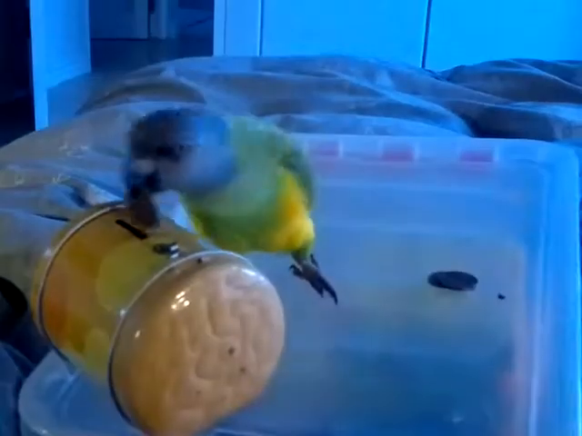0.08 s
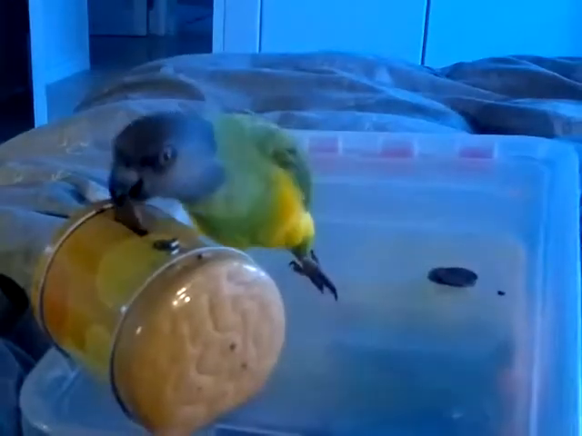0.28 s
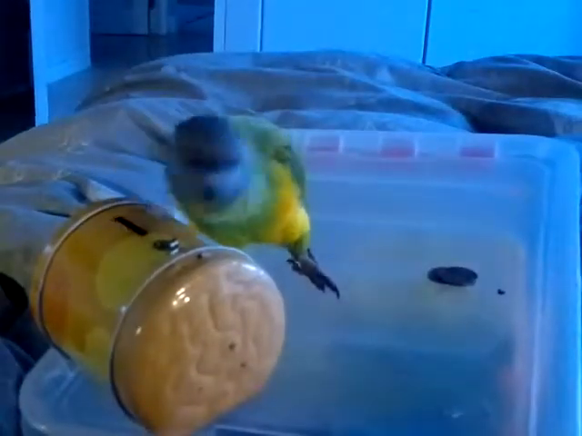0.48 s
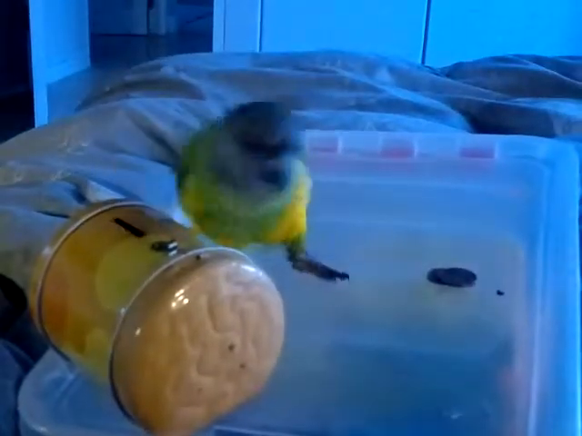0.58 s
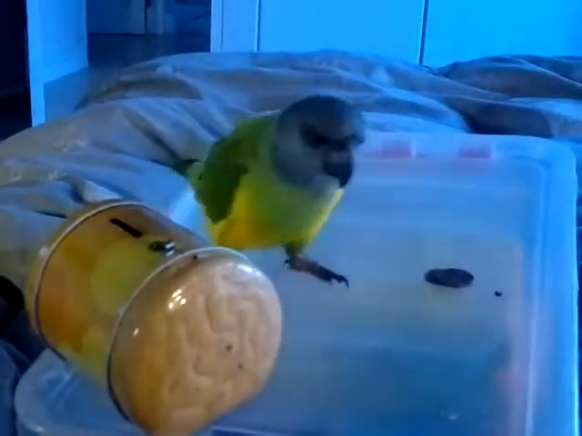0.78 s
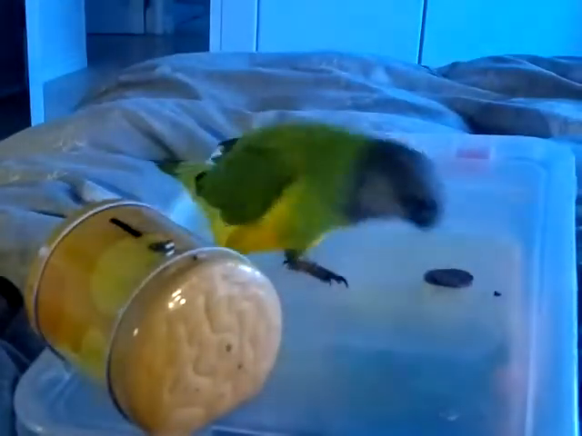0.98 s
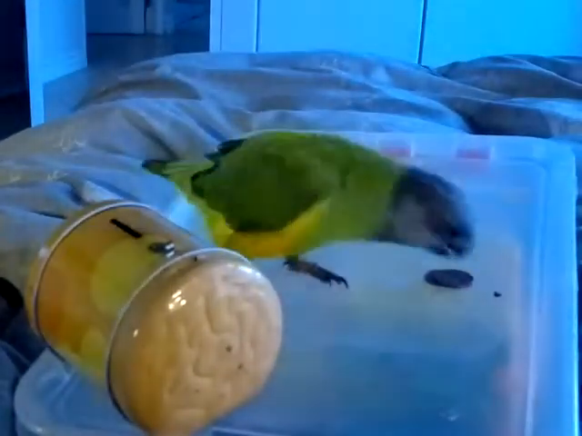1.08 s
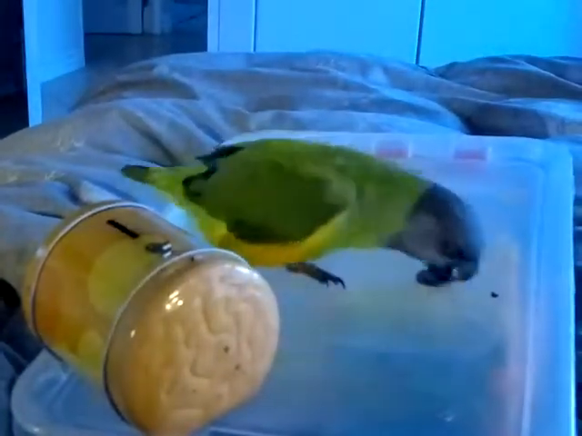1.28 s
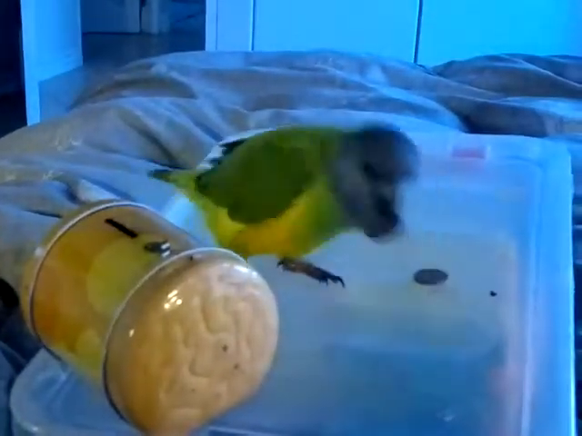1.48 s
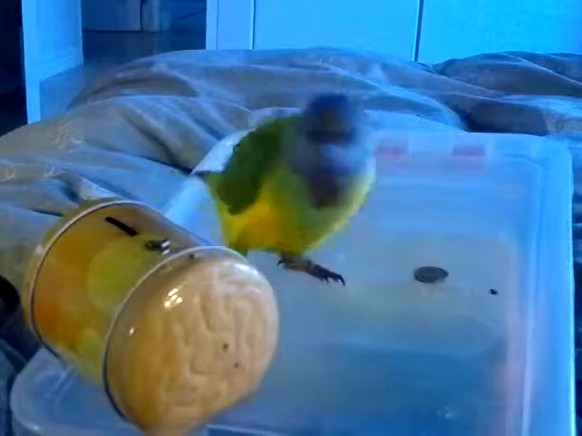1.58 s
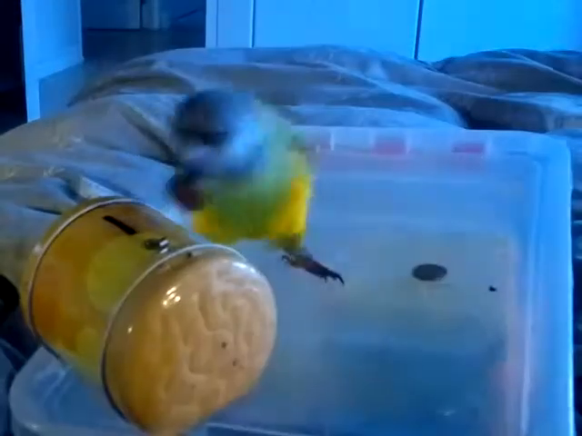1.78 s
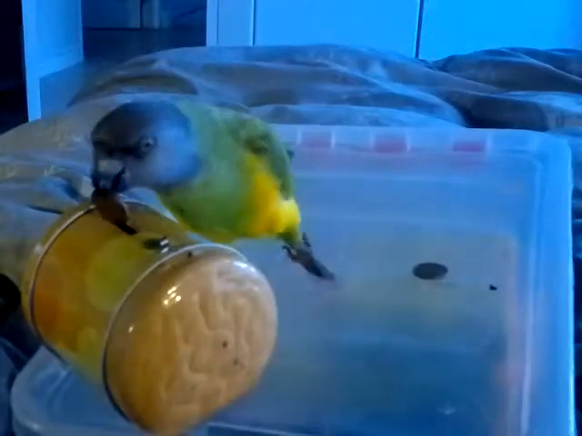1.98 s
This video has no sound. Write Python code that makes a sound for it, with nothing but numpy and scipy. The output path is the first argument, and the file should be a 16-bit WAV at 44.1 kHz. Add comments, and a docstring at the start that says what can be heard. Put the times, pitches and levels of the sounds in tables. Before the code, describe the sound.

A coin scrapes and taps at a tin bank's slot, drops in with loud bright bounces and rattles to rest; a beak clicks on a plastic lid, then another coin scrapes the tin, close in a soft-furnished room.

```python
"""A parrot scrapes and taps a coin along the slot of a tin coin bank; it drops in, bounces and rattles to rest.
The beak then picks the next coin off a plastic tub lid, and taps and scrapes it on the tin.
Throughout, a faint draught buffets the left microphone port of a small camera over its hiss.
Tin and lid are banks of decaying modes set off by single blows and streams of tiny contacts;
draught and hiss are coloured noise, and the room is a short tail of decaying noise."""
import sys
import numpy as np
from scipy import signal
from scipy.fft import rfft, irfft
from scipy.io import wavfile
from scipy.ndimage import uniform_filter1d

SR = 44100
rng = np.random.default_rng(int(sys.argv[2]) if len(sys.argv) > 2 else 0)


def wav_record(signal):
    """Record a signal, one row per channel, as 16-bit PCM in the file named by sys.argv[1]."""
    frames = np.transpose(np.atleast_2d(signal))
    bounded = np.clip(frames, -1, 1)
    # unit amplitude maps onto the largest positive 16-bit level
    quanta = np.round(bounded * 32767).astype(np.int16)
    wavfile.write(sys.argv[1], SR, quanta)


def how_loud(loudness_db):
    """Turn decibels into a plain amplitude multiplier (0 dB gives 1, 20 dB gives 10)."""
    steps = np.asarray(loudness_db, float) / 20
    return 10 ** steps


N = 88200

DULL_HZ = 5532  # soft contacts lose treble above this; modes below it die fast where a ring has a knock

# Decay of the low thumps of tin and lid. Each row: frequency in Hz, T60 in seconds.
THUMP_DECAY = [(70, .09), (400, .035)]


def at(table, hz, col=1):
    """Read a table column at the given frequencies, on a log-frequency axis."""
    rows = np.array(table, float)
    return np.interp(np.log(hz), np.log(rows[:, 0]), rows[:, col])


def coloured(table):
    """Noise of rms 1 whose spectrum follows the table."""
    hz = np.maximum(np.fft.rfftfreq(N, 1 / SR), 1)
    gain = how_loud(at(table, hz)) * (hz > table[0][0] / 2)
    noise = irfft(rfft(rng.standard_normal(N)) * gain, N)
    return noise / np.sqrt(np.mean(noise ** 2))


def hiss():
    """Steady microphone hiss, independent on the two ports and falling towards the treble."""
    # Hiss spectrum. Each row: frequency in Hz, relative density in dB per Hz.
    hiss_colour = [(40, -8), (80, -14), (170, -15.5), (1400, -36), (8000, -45), (15600, -54)]
    hiss_db = -64  # rms
    return how_loud(hiss_db) * np.array([coloured(hiss_colour), coloured(hiss_colour)])


def draught():
    """Gusty low buffeting by moving air, nearly all on the left port."""
    # Strength of the draught. Each row: time in seconds, left level in dB before the gusts.
    draught_level = [(0, -43), (.42, -43), (.835, -59), (0.866, -34.5), (.98, -38.5), (1.02, -46.5),
                     (1.1, -42), (1.2, -41.5), (1.31, -58), (1.351, -38), (1.41, -54.5), (1.59, -47.5),
                     (1.624, -32), (1.661, -54.5), (2.0, -47.5)]
    # Buffeting spectrum. Each row: frequency in Hz, relative density in dB per Hz.
    draught_colour = [(12, -2), (28, 4.5), (50, 1), (90, -9.5), (160, -25), (300, -69.5)]
    right_db, gust_db = -29.5, 2.5  # right port relative to left; gust spread before smoothing

    s, db = np.array(draught_level).T
    hold = int(SR / 25)  # a new gust value 25 times a second
    gust = np.repeat(rng.standard_normal(N // hold + 1), hold)
    gust = uniform_filter1d(gust, hold)[:N]
    envelope = how_loud(np.interp(np.arange(N) / SR, s, db) + gust_db * gust)
    return envelope * np.array([coloured(draught_colour), how_loud(right_db) * coloured(draught_colour)])


def room(x):
    """A short, dull diffuse tail from a soft-furnished room: decaying noise convolved with the sound."""
    t60_s, build_s = .16, .0029
    tail_db, top_hz = -14.5, 5240  # tail energy before its treble is cut
    alike_hz = 1000  # bass below this reaches both ports alike

    t = np.arange(SR // 2) / SR
    tail = rng.standard_normal((2, len(t))) * np.exp(-np.log(1000) * t / t60_s)
    tail = tail * np.minimum(t / build_s, 1)
    alike = signal.lfilter(*signal.butter(2, alike_hz, fs=SR), tail[0] - tail[1])
    tail = np.array([tail[0], tail[1] + alike])
    tail = tail / np.sqrt((tail ** 2).sum(axis=1))[:, None]
    tail = signal.lfilter(*signal.butter(2, top_hz, fs=SR), tail)
    return how_loud(tail_db) * signal.fftconvolve(x, tail, axes=1)[:, :N]


def rings(colour, decay, balance, count, lines=(), spots=8, snap=0., ring_db=0., rise_s=0.00024):
    """Left and right ring of an object at several spots: a sum of decaying modes, mean energy 1 per port.

    More snap makes the modes start more in step. lines are single strong modes."""
    # Phase between the ports. Each row: frequency in Hz, left lead in radians,
    # random spread of the lead in radians (narrowed by snap).
    port_phase = [(100, -0.95, 0.082), (1000, -0.23, .1), (1300, -2, 1.2), (2463, -2, 0.83),
                  (3383, -2.5, 2.2), (4644, -7.5, 3.2)]
    line_db, line_t60_s = -4.5, .055  # strongest line relative to the largest dense mode
    knock_s = .0043  # the struck spot dies this fast; the whole object rings on at ring_db
    patchy_db, neighbours = 3.2, 15  # each spot favours other groups of neighbouring modes

    # Dense modes, spread evenly in log frequency
    place = (np.arange(count) + rng.random(count)) / count
    hz = colour[0][0] * (colour[-1][0] / colour[0][0]) ** place
    t60 = at(decay, hz)
    size = how_loud(at(colour, hz)) * np.sqrt(hz / t60)
    if len(lines):
        line_hz, level = np.array(lines, float).T
        size = np.r_[size, size.max() * how_loud(level - level.max() + line_db)]
        hz = np.r_[hz, line_hz]
        t60 = np.r_[t60, line_t60_s + 0 * line_hz]

    t = np.arange(7000) / SR
    wave = np.exp(np.outer(2j * np.pi * hz - np.log(1000) / t60, t))
    rest = how_loud(ring_db * (hz < DULL_HZ))[:, None]
    wave = wave * (rest + (1 - rest) * np.exp(-(t / knock_s) ** 2))

    # How strongly each spot drives each mode
    group = uniform_filter1d(rng.standard_normal((spots, len(hz))), size=neighbours) * np.sqrt(neighbours)
    patches = how_loud(patchy_db * (group - group.mean(axis=0)))
    drive = size * (snap + rng.standard_normal((spots, len(hz)))) * patches

    spread = at(port_phase, hz, col=2) / (1 + snap)
    lead = at(port_phase, hz) + spread * rng.standard_normal((spots, len(hz)))
    side = how_loud(at(balance, hz) / 2)
    left = (drive * side * np.exp(.5j * lead)) @ wave
    right = (drive / side * np.exp(-.5j * lead)) @ wave
    out = np.array([left, right]).imag * np.minimum(t / rise_s, 1)
    return out / np.sqrt((out ** 2).sum(axis=2).mean(axis=0))[:, None]


def strike(ring, s, size, spot):
    """Set off the ring of the given spot at each time s, by convolving it with impulses."""
    train = np.zeros((ring.shape[1], N))
    sample = np.clip((s * SR).astype(int), 0, N - 1)
    np.add.at(train, (spot % len(train), sample), size)
    return signal.fftconvolve(ring, train[None], axes=2)[..., :N].sum(axis=1)


def peak_one(ring):
    """Scale each spot's ring to peak 1, averaged over the ports."""
    return ring / np.abs(ring).max(axis=2).mean(axis=0)[:, None]


def blows(high, low, table):
    """Single hits, each on the next spot, heard in the bright and the hollow ring."""
    s, db, low_rel = np.array(table, float).T
    spot = np.arange(len(s))
    return strike(peak_one(high), s, how_loud(db), spot) + strike(peak_one(low), s, how_loud(db + low_rel), spot)


def chatter(high, low, thump, curves, per_s, scatter_db, firm_db):
    """A friction stream of tiny uneven contacts at random times; those softer than firm_db lose treble."""
    spot_s = .018  # the contact stays this long at a spot
    dull_db_per_db = 1.74  # loss of treble per dB below firm

    dull = signal.lfilter(*signal.butter(4, DULL_HZ, fs=SR), high)
    draw = rng.random((4000, 3))
    s = np.cumsum(-np.log(draw[:, 0])) / per_s
    even = np.sign(draw[:, 2] - .5) * np.sqrt(SR / per_s)  # equal pushes of either sign
    size = how_loud(scatter_db * -np.log(draw[:, 1]))
    uneven = even * size / np.sqrt(np.mean(size ** 2))
    spot = (s / spot_s).astype(int)

    out = np.zeros((2, N))
    for curve in curves:
        time, high_db, low_rel, thump_rel = np.array(curve, float).T
        on = (s > time[0]) & (s < time[-1])
        when, where = s[on], spot[on]
        db = np.interp(when, time, high_db)
        firm = how_loud(dull_db_per_db * np.minimum(db - firm_db, 0))
        out += strike(high, when, firm * uneven[on] * how_loud(db), where)
        out += strike(dull, when, (1 - firm) * uneven[on] * how_loud(db), where)
        low_db = db + np.interp(when, time, low_rel)
        out += strike(low, when, uneven[on] * how_loud(low_db), where)
        thump_db = db + np.interp(when, time, thump_rel)
        out += strike(thump, when, even[on] * how_loud(thump_db), where)
    return out


def tub():
    """Beak and coin click and drag on the plastic lid, whose panel sounds and flexes below the clicks."""
    # Beak and coin clicks. Each row: time in seconds, click peak in dB, panel relative to click in dB.
    tub_clicks = [(1.136, -56.5, 2.5), (1.1575, -29, -10), (1.1793, -32, -0.5), (1.2049, -27.5, -15.5),
                  (1.2109, -23, -29), (1.2503, -20, -11), (1.2558, -24, -28), (1.2723, -24, -2),
                  (1.2788, -14.5, -11), (1.2876, -21, -14), (1.61, -50.5, -12)]
    # Coin dragged on the lid, one list per drag. Each row: time in seconds, click level in dB,
    # panel relative to click in dB, thump relative to click in dB.
    tub_drag = [
        [(1.152, -59.5, 1, 22.5), (1.185, -47, 7, 5.5), (1.205, -44.5, -19, -49), (1.235, -67, 18.5, 27.5),
         (1.255, -46, 5, 7.5), (1.285, -41.5, -2.5, -11.5), (1.31, -48.5, -2, 0), (1.34, -78, 1, -13)],
    ]
    # Spectra of click, hollow panel and lid flexing under the beak.
    # Each row: frequency in Hz, relative density in dB per Hz.
    click_colour = [(1350, 3.5), (2600, 12), (3700, 8.5), (4700, -9.5), (5500, -20), (9000, -29.5),
                    (15600, -42.5)]
    panel_colour = [(380, 6.5), (480, -29), (640, 9), (800, -16), (1040, 11.5), (1450, -12)]
    flex_colour = [(60, 0), (110, -14), (200, 9), (270, -15), (380, -6.5)]
    # Decay of the plastic. Each row: frequency in Hz, T60 in seconds.
    tub_decay = [(300, 0.049), (1000, 0.033), (3500, 0.013), (15000, 0.02)]
    # Stereo place of the tub. Each row: frequency in Hz, left over right in dB.
    tub_balance = [(100, 11), (400, 0.5), (1300, -2.5), (2400, 1.5), (4400, 16.5), (8100, -33),
                   (15000, -21)]

    click = rings(click_colour, tub_decay, tub_balance, count=120, snap=0.99)
    panel = rings(panel_colour, tub_decay, tub_balance, count=30, snap=0.43)
    thump = rings(flex_colour, THUMP_DECAY, tub_balance, count=20)
    drag = chatter(click, panel, thump, tub_drag, per_s=1300, scatter_db=2.5, firm_db=-45.5)
    return blows(click, panel, tub_clicks) + drag


def tin():
    """The coin sets off the tin's modes: taps and scrapes at the slot, bounces and rattle inside."""
    # Coin tapping the slot from outside. Each row: time in seconds, shell peak in dB,
    # wall relative to shell in dB.
    slot_taps = [(0.0815, -22, -49), (0.0922, -21, -14), (0.0982, -22, -16), (0.2069, -17.5, -36),
                 (0.2427, -19, -26), (0.2512, -25, -29), (0.2905, -14, -55), (0.2954, -10.5, -17.5),
                 (0.3079, -11.5, -34.5), (1.7825, -27.5, -13.5), (1.7966, -25.5, -19), (1.8965, -19, -21),
                 (1.9003, -19.5, -17.5), (1.9646, -33.5, -14)]
    # Coin held in the beak scraping the slot, one list per scrape. Each row: time in seconds,
    # shell level in dB, wall relative to shell in dB, thump relative to shell in dB.
    slot_scrape = [
        [(0, -36, -14, -11.5), (.045, -54.5, -19, -18), (.078, -50.5, -15, -7), (.084, -30.5, -16.5, -19),
         (.125, -33.5, -17, -48), (.155, -52, -27, -8), (.185, -35.5, -20, -58), (.216, -19.5, -21.5, -22),
         (.235, -29, -13.5, -14.5), (.28, -30, -19.5, -46), (.3, -26, -17.5, -10.5), (.34, -31.5, -21, -21.5),
         (.38, -46, -46, -23.5)],
        [(1.78, -34.5, -10, -9), (1.805, -30.5, -15, -18), (1.845, -44, -12.5, -9.5),
         (1.892, -47.5, -14.5, -19), (1.905, -32, -18, -24), (1.94, -33.5, -28.5, -37), (1.96, -53, -14, -14),
         (2.0, -50.5, -5, -15)],
    ]
    # Coin bouncing inside. Each row: time in seconds, shell peak in dB, hollow body relative to shell in dB.
    bounces = [(0.3933, -3, -24.5), (0.3975, -6, -18.5), (0.4068, -1.5, -3), (0.4362, -3.5, -19.5),
               (0.4434, -11, -16), (0.4614, -1.5, -10.5), (0.4755, -3, -0.5), (0.4804, -9, -10.5),
               (0.5109, -13.5, -3.5), (0.5381, -16, -3.5), (0.5573, -8.5, -21), (0.5994, -21, -6),
               (0.6284, -21, -15)]
    # Coin rattling to rest inside, one list per rattle. Each row: time in seconds, shell level in dB,
    # body relative to shell in dB, thump relative to shell in dB.
    rattle = [
        [(.392, -20, -6.5, -7), (.43, -17.5, -11, -18.5), (.49, -23.5, -7.5, -42), (.56, -21, -11, -29),
         (.62, -31, -10.5, -9), (.66, -36.5, -11, -23.5), (.7, -52.5, -10, -45), (.73, -83, -26, -18)],
    ]
    # Strongest single modes of the tin. Each row: frequency in Hz, relative level in dB.
    tin_modes = [(668, -36), (743, -35.5), (985, -30.5), (1190, -35), (3000, -42), (3310, -41.5),
                 (3600, -44), (4400, -40.5)]
    # Spectra of the dense modes round the slot, those of the whole shell, the wall, the hollow body
    # and the tin rocking on the lid. Each row: frequency in Hz, relative density in dB per Hz.
    slot_colour = [(1350, -12.5), (1800, -9.5), (2320, 0), (2600, -3.5), (3670, 2.5), (5000, -3),
                   (6100, -13), (8200, -27), (15600, -34)]
    shell_colour = [(1350, -14), (1900, -5.5), (2600, -4.5), (3650, 4), (4500, -6), (5900, -14),
                    (11000, -33), (15600, -33)]
    wall_colour = [(330, -14.5), (600, -29), (900, -9.5), (1130, 5), (1450, -24)]
    body_colour = [(330, -19.5), (520, -13), (700, -0.5), (850, -12), (1100, 7), (1450, -13.5)]
    rock_colour = [(50, -1), (400, -3.5)]
    # Decay of the dense modes. Each row: frequency in Hz, T60 in seconds.
    tin_decay = [(300, 0.03), (1000, 0.014), (3500, 0.12), (15000, .025)]
    # Stereo place of the tin. Each row: frequency in Hz, left over right in dB.
    tin_balance = [(100, 4.5), (700, -1.5), (2400, 3), (4400, -0.2), (6500, -5), (8100, -11), (15000, -20)]
    rise_s = .0015  # the coin skids, so a blow on the tin builds briefly
    bright = dict(count=440, snap=0.16, ring_db=-5, rise_s=rise_s)
    friction = dict(per_s=800, scatter_db=2.6, firm_db=-31)

    modes = np.array(tin_modes, float)
    is_high = modes[:, 0] > body_colour[-1][0]
    shell = rings(shell_colour, tin_decay, tin_balance, lines=modes[is_high], **bright)
    slot = rings(slot_colour, tin_decay, tin_balance, lines=modes[is_high], **bright)
    body = rings(body_colour, tin_decay, tin_balance, count=40, lines=modes[~is_high],
                 snap=0.58, rise_s=rise_s)
    wall = rings(wall_colour, tin_decay, tin_balance, count=40)
    thump = rings(rock_colour, THUMP_DECAY, tin_balance, count=20)

    outside = blows(slot, wall, slot_taps) + chatter(slot, wall, thump, slot_scrape, **friction)
    inside = blows(shell, body, bounces) + chatter(shell, body, thump, rattle, **friction)
    return outside + inside


def scene():
    """Tin and tub with their room tail, over draught and hiss."""
    near = tin() + tub()
    return hiss() + draught() + room(near) + near


def band_limit(x):
    """A steep low-pass at the top of the band."""
    return signal.sosfilt(signal.butter(12, 15690, fs=SR, output="sos"), x)


def record(dry):
    """The camera rounds the loudest peaks and cuts the top."""
    drive, top_hz = .6, 15700
    rounded = np.tanh(drive * dry) / drive
    top_cut = signal.ellip(8, .2, 70, top_hz, fs=SR, output="sos")
    mix = signal.sosfilt(top_cut, rounded)
    return band_limit(mix)


dry = scene()
out = record(dry)
wav_record(out)
```